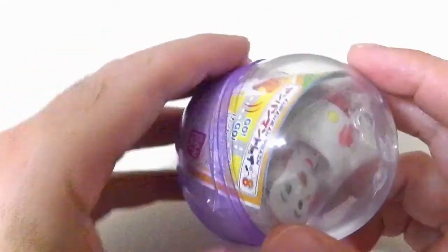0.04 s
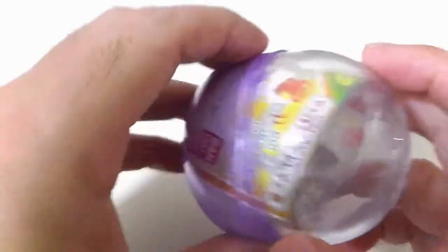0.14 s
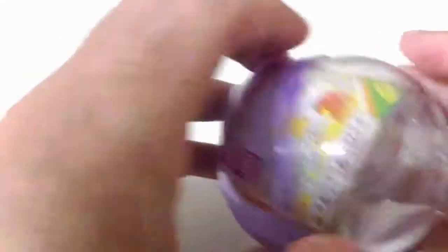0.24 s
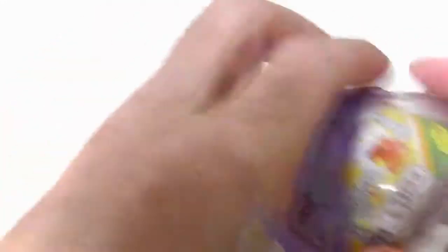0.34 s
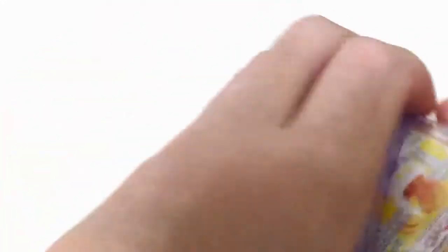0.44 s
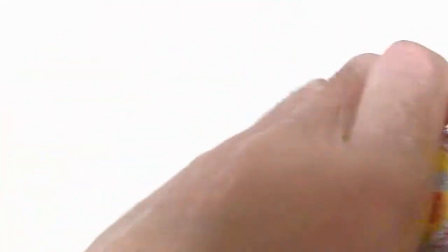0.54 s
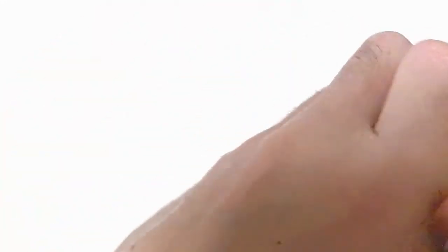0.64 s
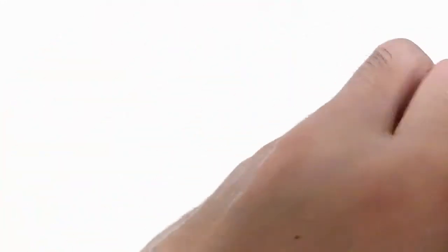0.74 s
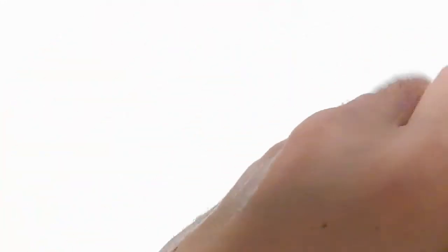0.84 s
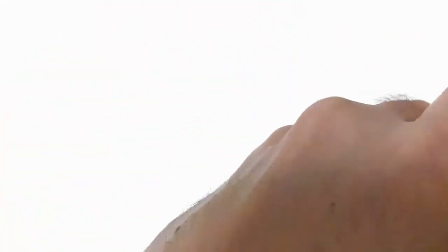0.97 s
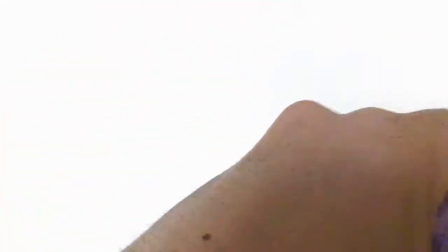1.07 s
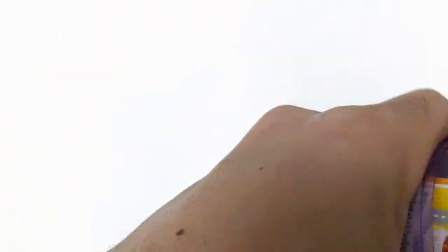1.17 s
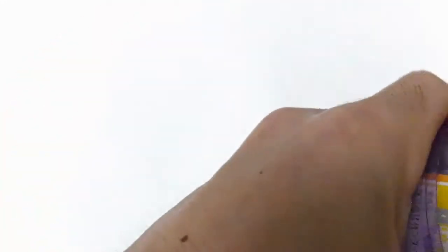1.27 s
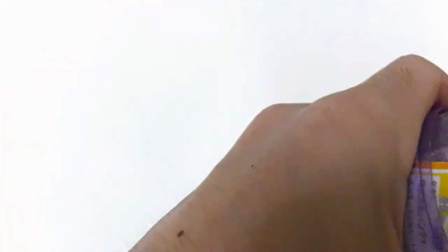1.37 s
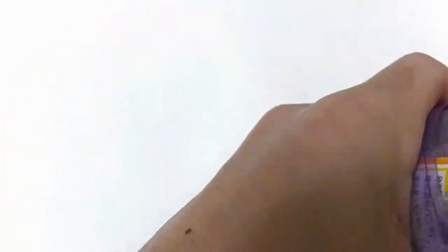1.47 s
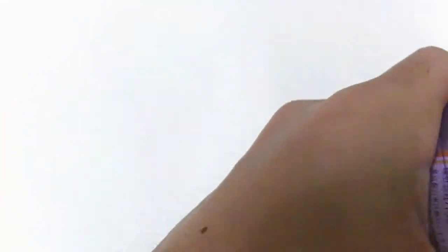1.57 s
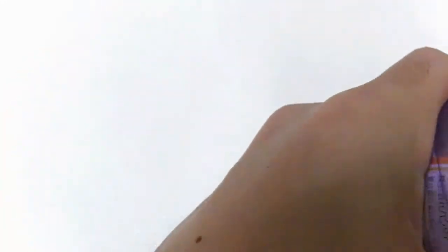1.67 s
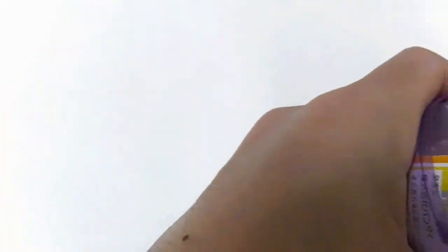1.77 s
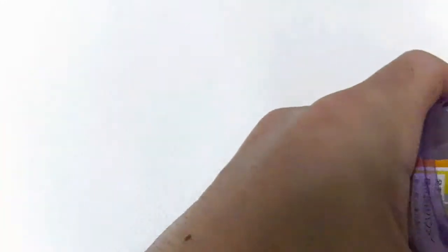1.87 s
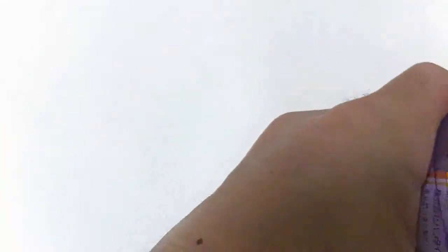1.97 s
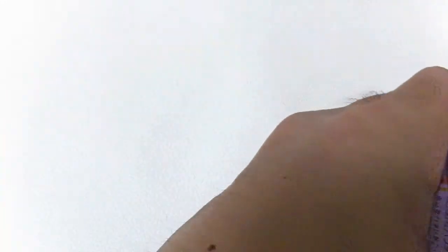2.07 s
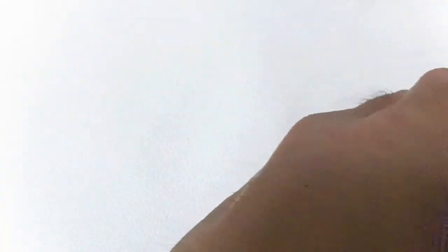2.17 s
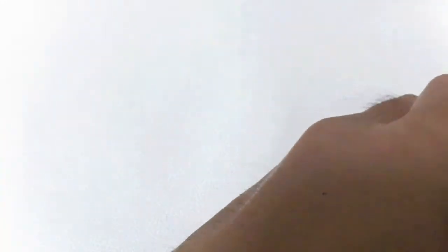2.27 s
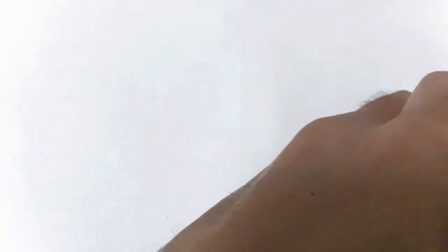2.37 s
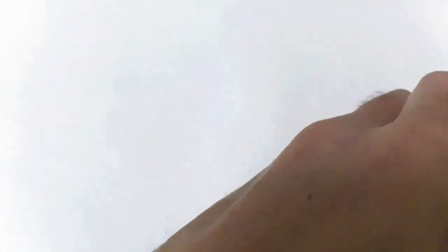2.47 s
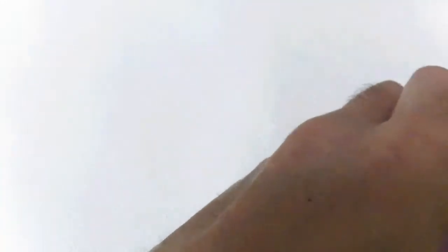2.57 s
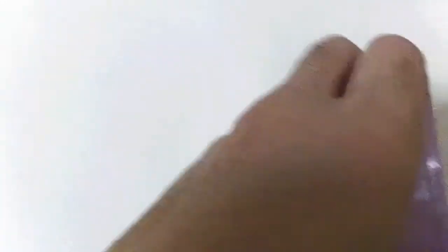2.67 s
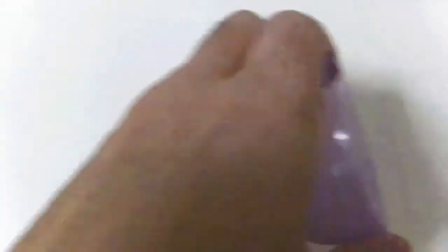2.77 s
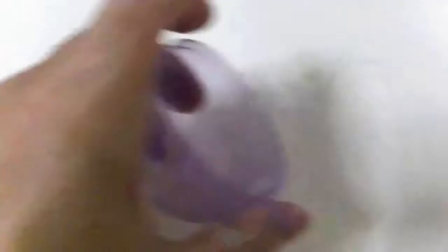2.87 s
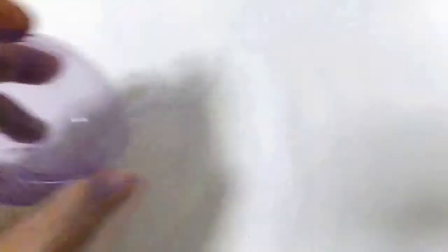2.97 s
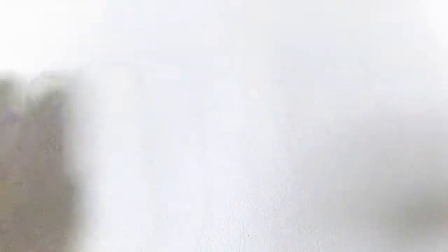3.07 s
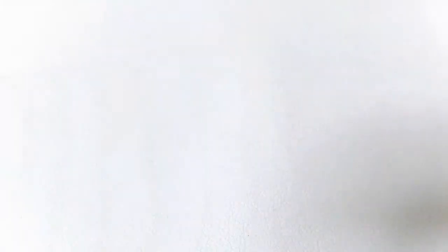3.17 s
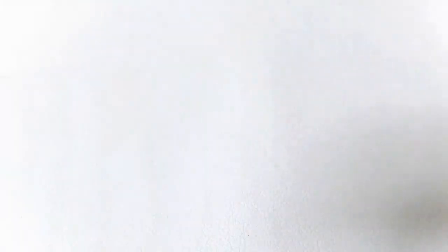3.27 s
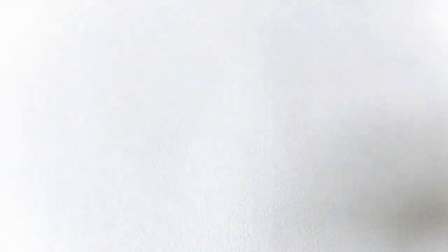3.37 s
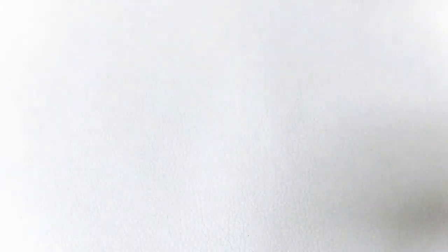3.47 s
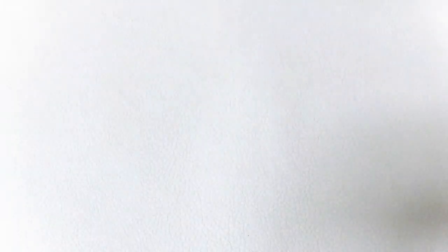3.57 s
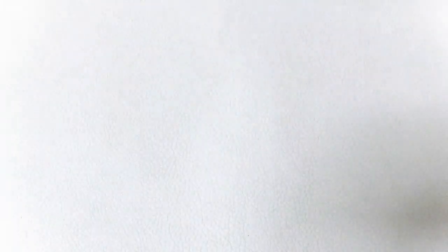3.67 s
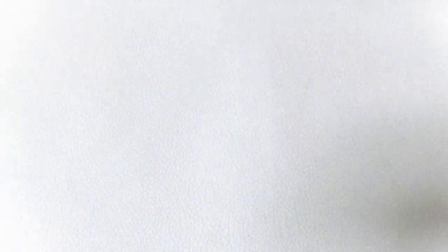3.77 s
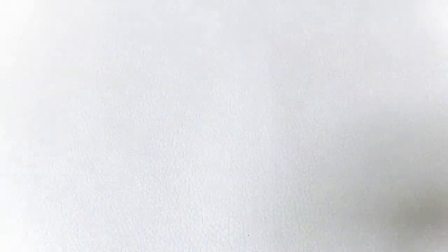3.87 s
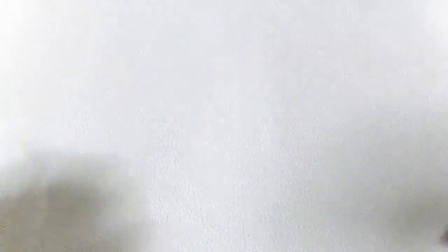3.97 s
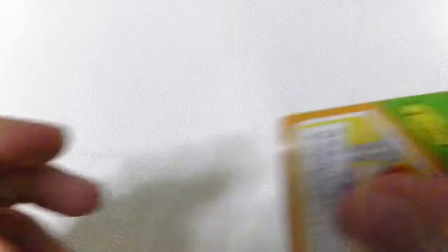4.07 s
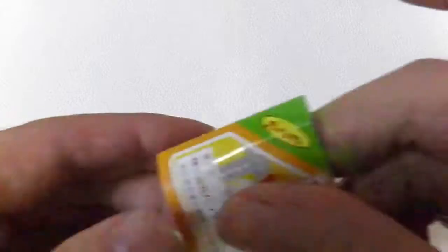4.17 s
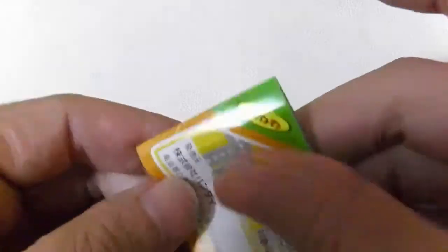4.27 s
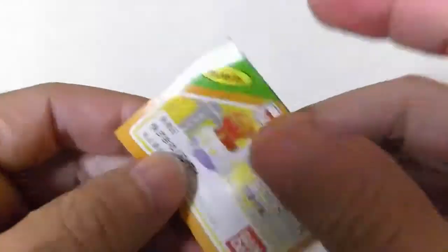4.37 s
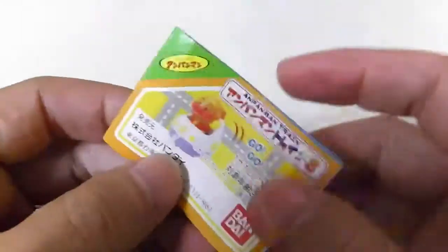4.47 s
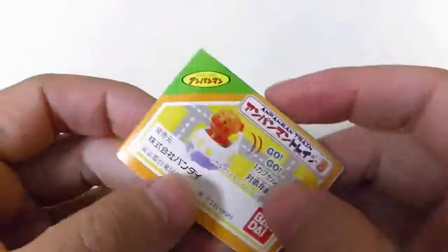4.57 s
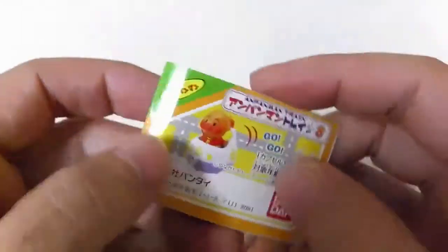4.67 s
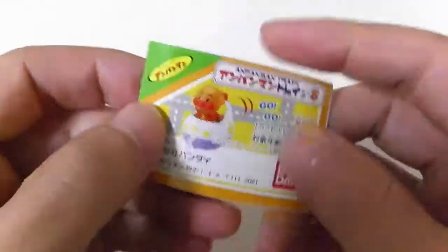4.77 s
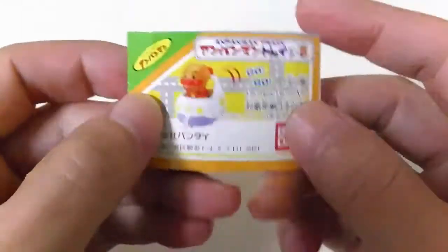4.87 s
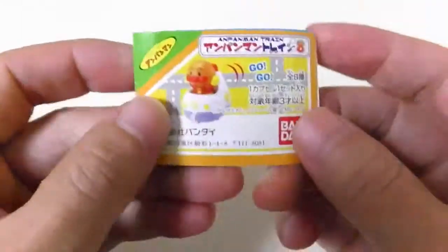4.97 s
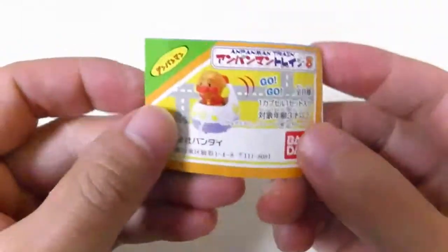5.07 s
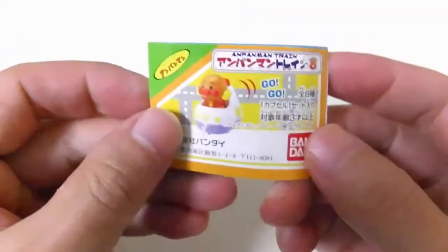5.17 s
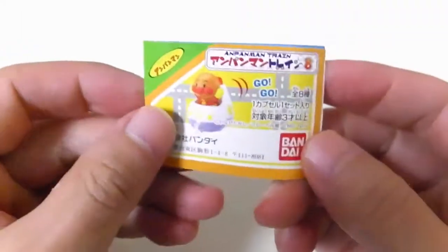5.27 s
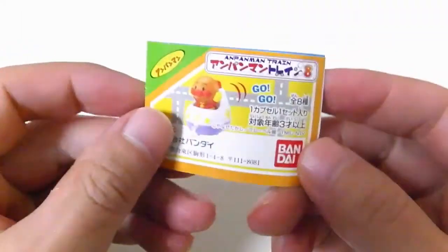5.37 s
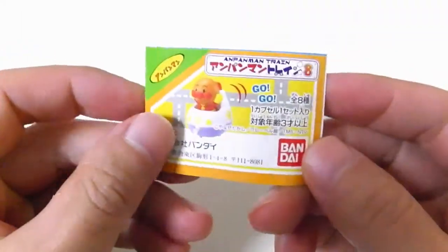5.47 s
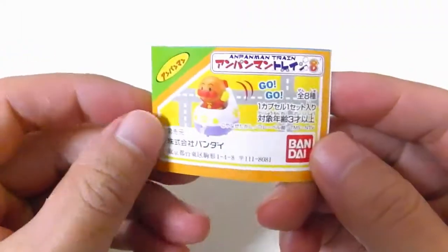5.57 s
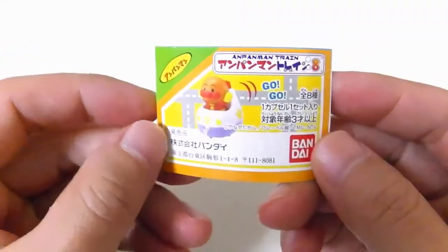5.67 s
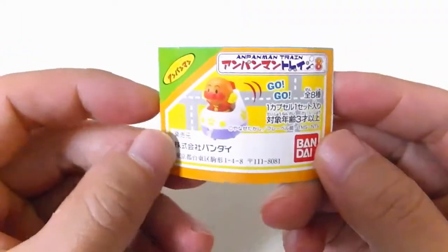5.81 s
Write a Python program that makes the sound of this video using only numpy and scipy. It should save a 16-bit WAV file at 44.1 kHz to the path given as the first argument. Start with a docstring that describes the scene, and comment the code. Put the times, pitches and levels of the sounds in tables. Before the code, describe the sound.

Close plastic capsule clicks and cracks open, its hollow shell pieces clack onto a table, then faint paper rustling fades into a quiet, hissy room.

```python
"""Hands pry a plastic toy capsule apart close to a pair of microphones, set its halves down on a table,
then pull out a folded paper slip and open it. Uneven bursts ring the hollow shell and crack in the treble;
random slips of fingers and paper rub and rustle throughout; soft pushes make the table boom, the last
just after 5.3 s. Room and hiss lie behind. The recorder passes the treble a little ahead of the rest."""
import sys
import numpy as np
from scipy import signal
from scipy.fft import rfft, irfft, next_fast_len
from scipy.io import wavfile
from scipy.ndimage import uniform_filter1d

SR = 44100
rng = np.random.default_rng(int(sys.argv[2]) if len(sys.argv) > 2 else 0)


def persist_wave(psi):
    """Save psi, clipped to +-1, as 16-bit WAV."""
    counts = np.round(np.clip(psi, -1, 1) * 32767).astype(np.int16)
    wavfile.write(sys.argv[1], SR, np.atleast_2d(counts).T)


N = 257544
SPLIT_HZ = 4050  # the treble starts here

# snaps and taps, timed ahead of the treble lead, levels ahead of filters and lean:
# (t/s, shell ring level/dB, crack level/dB, ring centre f/Hz, ring breadth/octaves, time scale/ms)
SNAPS = [(0.012, -36, -60, 2310, 3.9, 10.4), (0.1086, -38, -33.5, 2500, 0.68, 3.5),
         (0.622, -37.5, -42, 1820, 1.3, 2.9), (0.7397, -36, -36, 2130, 0.59, 3.2),
         (0.9518, -26.5, -31.5, 536, 1.1, 3.16), (1.007, -27, -47, 554, 0.8, 3.2),
         (1.046, -13, -13.5, 660, 0.41, 3.54), (1.056, -16.5, -33, 1010, 3, 4),
         (1.0748, -18.5, -25, 1290, 0.63, 2.54), (1.078, -27, -28, 1470, 0.74, 3.4),
         (1.0964, -18, -20.5, 1700, 0.81, 2.56), (1.113, -46, -36, 2200, 0.61, 2.8),
         (1.1611, -29.5, -39, 1046, 0.15, 5.1), (1.259, -63, -28, 2350, .75, 6.1),
         (1.2882, -32.5, -39, 1590, 0.87, 2.43), (1.398, -36.5, -30.5, 1780, 2.7, 4.4),
         (1.6286, -35.5, -27, 2520, 0.87, 2.8), (1.8749, -9, -28, 1240, 0.51, 3.3),
         (1.881, -14, -36.5, 1380, 0.55, 22), (1.9254, -6.5, -15, 1870, 0.54, 5.5),
         (1.9283, -7.5, -38, 1500, 1.58, 15), (2.2681, -27.5, -17.5, 2150, 1.05, 3),
         (2.2871, -34.5, -30, 1730, 1.3, 6.6), (2.319, -40.5, -52, 1000, 0.19, 3.7),
         (2.373, -41, -26.5, 2420, 0.44, 1.9), (2.3804, -41, -26, 2500, 0.56, 3.5),
         (2.4107, -19, -9, 3190, 0.15, 1.21), (2.479, -39.5, -29.5, 2070, 1.2, 13),
         (2.5004, -34.5, -39, 1420, 1.7, 10), (2.559, -26.5, -34.5, 2230, 0.42, 3.6),
         (2.6419, -26, -33, 2040, 1.8, 2.64), (2.65, -26.5, -30, 2600, 0.27, 5.3),
         (2.66, -32, -24, 3260, 0.32, 3.3), (2.819, -34.5, -30, 2720, 0.72, 5.2),
         (2.8361, -35, -35, 2980, 0.45, 11), (2.853, -24.5, -23.5, 1430, 1.1, 3.4),
         (2.906, -33.5, -37, 1600, 1.3, 6.1), (2.9628, -35.5, -36, 1850, 1.6, 4.1),
         (3.004, -33, -63, 970, 0.67, 2.53), (3.058, -31, -24, 2500, 0.57, 6.2),
         (3.19, -36, -50, 1280, 0.29, 3.5), (3.182, -46, -29, 1410, 0.66, 2.6),
         (3.2802, -12.5, -20, 1620, 0.67, 7.6), (3.3848, -44, -45, 2300, 0.62, 2.4),
         (3.6304, -28.5, -30, 1380, 6.4, 2.07), (3.6384, -30.5, -26, 1950, 0.58, 5.5),
         (3.7102, -5, -12.5, 955, 1.5, 6.7), (3.712, -16.5, -11.5, 1380, 0.76, 8.7),
         (3.7299, -11.5, -21, 990, 0.71, 18.4), (4.24, -51, -35, 2470, 1.1, 9.3),
         (4.246, -34, -28.5, 1500, 4.3, 2.75), (4.2904, -37.5, -40, 2640, 0.38, 2.2),
         (4.427, -44.5, -59, 2870, 0.18, 1.4), (4.518, -44, -40, 2700, 0.63, 1.12),
         (4.7482, -47, -33, 1320, 1.6, 2.7)]
# modes of the hollow shell, undamped by the hands: (f/Hz, level/dB, t60/s)
SHELL_MODES = [(440, -6, .12), (542, 3, .12), (675, -5, .15), (738, -3, .2), (900, -2, .16), (1060, 1, .13),
               (1190, -3, .14), (1322, -2, .15), (1543, -3, .14), (1790, 1, .12), (2000, -1, .14),
               (2360, -5, .06), (2690, 0, .09), (3050, -5, .08), (3350, -5, .06), (3700, -3, .05)]


def from_db(db):
    """Gain of a level."""
    return 10 ** (np.asarray(db) / 20)


def rms_one(x):
    """Scaled to rms 1."""
    return x / np.sqrt(np.mean(x ** 2) + 1e-20)


def at_hz(points, hz):
    """A spectrum read on a log-frequency axis."""
    points_hz, values = np.array(points).T
    return np.interp(np.log(np.maximum(hz, 1)), np.log(points_hz), values)


def coloured(x, spectrum):
    """x shaped by a (f/Hz, level/dB) spectrum; rms 1."""
    size = next_fast_len(N)
    hz = np.arange(size // 2 + 1) * SR / size
    shaped = irfft(rfft(x, size) * from_db(at_hz(spectrum, hz)), size)
    return rms_one(shaped[..., :N])


def drift(rate):
    """Slow chance: straight lines between random points, rate of them a second; rms 1."""
    points = rng.standard_normal(int(N / SR * rate) + 2)
    return rms_one(np.interp(np.arange(N) / SR * rate, np.arange(len(points)), points))


def ringing(modes, gains, seconds):
    """Struck modes: a sum of sines, each losing 60 dB in its own t60."""
    t = np.arange(int(seconds * SR)) / SR
    hz, db, t60 = np.transpose(modes)[:, :, None]
    decay = from_db(db - 60 * t / np.maximum(t60, .005))
    return gains @ (decay * np.sin(2 * np.pi * hz * t))


def peak_at(x, db):
    """Scaled so that the envelope over the loudest millisecond or so has this level."""
    power = uniform_filter1d(np.mean(np.atleast_2d(x) ** 2, axis=0), 50)
    return x * from_db(db) / np.sqrt(2 * power.max())


def add(out, sound, s):
    """Mixes a sound in at time s."""
    at = round(s * SR)
    out[..., at:at + sound.shape[-1]] += sound[..., :N - at]


def sides(db):
    """Left and right gains of a left-minus-right difference."""
    return from_db(np.array([db / 2, -db / 2]))


def passed(x, low_hz, high_hz):
    """A band-pass."""
    sos = signal.butter(2, [low_hz, min(high_hz, .45 * SR)], "band", fs=SR, output="sos")
    return signal.sosfilt(sos, x)


def treble(x):
    """The part above the split."""
    return signal.sosfilt(signal.butter(8, SPLIT_HZ, "high", fs=SR, output="sos"), x)


def patches(x, low_hz, bands, depth_db, rate):
    """Half-octave bands of x that swell and fade, each in its own time."""
    out = 0
    for low in low_hz * 2 ** (np.arange(bands) / 2):
        sos = signal.butter(2, [low, low * np.sqrt(2)], "band", fs=SR, output="sos")
        out = out + from_db(depth_db * drift(rate)) * signal.sosfilt(sos, x)
    return out


def air(level_db=-55, patchy_db=0.65):
    """Hiss and rumble, wavering slightly in level, partly shared by both microphones."""
    # colour of the background: (f/Hz, level/dB)
    air_colour = [(20, -44), (40, -9.5), (80, 3), (200, -1.5), (430, -4.5), (1100, -9), (3800, -12.5),
                  (5400, -16.5), (11000, -16), (15200, -23), (16500, -46)]
    # share of its power common to both microphones: (f/Hz, share)
    air_alike = [(100, 0.8), (1500, 0.22)]
    shared, left, right = rng.standard_normal((3, N))
    hz = np.arange(N // 2 + 1) * SR / N
    alike = np.clip(at_hz(air_alike, hz), 0, 1)
    common = np.sqrt(alike) * rfft(shared)
    own = np.sqrt(1 - alike) * rfft(np.array([left, right]))
    return from_db(level_db + patchy_db * drift(22.0)) * coloured(irfft(common + own, N), air_colour)


def room(x, alike=0.85):
    """Reflections as noise that dies octave by octave."""
    # decay of the room: (f/Hz, t60/s)
    room_t60 = [(100, 0.37), (700, 0.28), (3000, 0.22)]
    t = np.arange(int(.5 * SR)) / SR
    noise, tail = rng.standard_normal((3, len(t))), 0
    for low in 70 * 2.0 ** np.arange(8):
        band = signal.sosfilt(signal.butter(2, [low, 2 * low], "band", fs=SR, output="sos"), noise)
        tail = tail + band * from_db(-60 * t / at_hz(room_t60, low * np.sqrt(2)))
    tail = tail * np.minimum(t / 0.0048, 1)  # reflections build up over 4.8 ms
    pair = alike * tail[0] + (1 - alike) * tail[1:]
    pair = pair / np.sqrt(np.sum(pair ** 2) / 2)
    return signal.fftconvolve(x[None], pair, axes=1)[:, :N]


def knocks(reach_oct=0.57, push_s=0.00009):
    """A soft push booms the table top, most near the modes under it; a resting hand shortens the boom."""
    # knocks, levels ahead of the low cut: (t/s, peak level/dB, boom centre f/Hz, share of the free t60)
    pushes = [(0.0, -29, 98, 0.82), (1.049, -26, 209, 0.85), (1.88, -45, 340, 1), (3.71, -24.5, 214, 0.78),
              (5.32, -33, 210, 0.55), (5.327, -24.5, 195, 0.31)]
    # modes of the free table top: (f/Hz, level/dB, t60/s)
    table_modes = [(113.8, 3, 0.45), (140.2, -6.5, 0.53), (218, -0.5, 0.2), (340, 8, 0.21),
                   (437.4, 13.5, 0.33), (534, 24, 0.2)]
    out = np.zeros(N)
    push = np.hanning(max(int(push_s * SR), 3))
    for s, db, centre_hz, free in pushes:
        octaves_off = np.log2(np.array(table_modes)[:, 0] / centre_hz)
        near = from_db(-6 * (octaves_off / reach_oct) ** 2)
        boom = ringing(np.array(table_modes) * [1, 1, free], near, .5)
        boom = signal.fftconvolve(push, boom)
        add(out, from_db(db) * boom / np.abs(boom).max(), s)
    return signal.sosfilt(signal.butter(2, 80, "high", fs=SR, output="sos"), out)


def grains(per_s, size_db, clump_db):
    """Tiny random slips of uneven size, coming in clumps."""
    sizes = from_db(size_db * np.minimum(rng.exponential(1, N), 4)) * rng.choice([-1, 1], N)
    return sizes * (rng.random(N) < per_s * from_db(clump_db * drift(40)) / SR)


def pressure(stroke_column, snap_column, rattle_db):
    """Gain of the handling: strokes swell, hold and let go; loose contents rattle on after each snap."""
    # fingers over plastic and paper, levels ahead of the mix; an end before its start is a weaker brief touch:
    # (start t/s, end t/s, dull rubbing level/dB, bright rustle level/dB)
    finger_strokes = [(0.0, 0.0032, -42.5, -54), (0.075, 0.25, -60.5, -62), (0.586, 0.65, -61, -60),
                      (0.752, 0.88, -58, -59), (1.05, 1.058, -33, -38), (1.13, 1.296, -53.5, -53),
                      (1.36, 1.43, -50, -54), (2.289, 2.26, -37, -41.5), (2.41, 2.63, -51.5, -56),
                      (2.812, 3.1, -54.5, -58.5), (3.13, 3.155, -48.5, -50), (3.36, 3.5, -56, -60),
                      (3.631, 3.63, -46, -48.5), (3.695, 3.712, -40, -42), (4.265, 4.36, -61, -55),
                      (4.53, 4.66, -64, -60.5), (5.131, 5.25, -64, -58.5), (5.526, 5.43, -71, -54)]
    swell_db_per_s, let_go_db_per_s, rattle_fade_db_per_s = 388, 253, 192
    t = np.arange(0, N + 64, 64) / SR  # one point every 64 samples
    strokes, snaps = np.array(finger_strokes)[:, :, None], np.array(SNAPS)[:, :, None]
    before = swell_db_per_s * np.maximum(strokes[:, 0] - t, 0)
    after = let_go_db_per_s * np.maximum(t - strokes[:, 1], 0)
    stroke = from_db(strokes[:, stroke_column] - before - after)
    since = t - snaps[:, 0]
    fading_db = snaps[:, snap_column] + rattle_db - rattle_fade_db_per_s * np.abs(since)
    rattle = (since > 0) * from_db(fading_db)
    power = np.sum(stroke ** 2, axis=0) + np.sum(rattle ** 2, axis=0)
    return np.interp(np.arange(N) / SR, t, np.sqrt(power))


def handling(lean_db=-8.5):
    """Skin on plastic and creasing paper: the same slips give a dull rub, a faint ring and a bright rustle."""
    # colour of the dull rub: (f/Hz, level/dB)
    rub_colour = [(300, -20), (700, 1), (1500, -3), (3700, 0.5), (4400, -11.5)]
    # colour of the bright rustle: (f/Hz, level/dB)
    rustle_colour = [(4300, -20), (6500, -5), (9000, -8), (12500, -10.5), (16000, -28)]
    slips = rms_one(grains(per_s=800, size_db=3.5, clump_db=8.0))
    smooth = rng.standard_normal((3, N))
    rub = patches(slips + .3 * smooth[0] + .2 * smooth[1:], 300, 8, depth_db=2.0, rate=40)
    rustle = patches(slips + .5 * smooth[1:], 4000, 4, depth_db=1.6, rate=40)
    dull = pressure(2, 1, rattle_db=-28.5)  # rattle follows the shell ring
    bright = pressure(3, 2, rattle_db=-42)  # rattle follows the crack
    shell = ringing(np.array(SHELL_MODES) * [1, 1, 0.35], np.ones(len(SHELL_MODES)), .08)  # held: brief ring
    rung = signal.fftconvolve(dull * slips, shell / np.sqrt(np.sum(shell ** 2)))[:N]
    rubbed = 1.204 * dull * coloured(rub, rub_colour)
    rustled = bright * treble(coloured(rustle, rustle_colour)) * sides(lean_db)[:, None]
    return rubbed + 0.37 * rung + rustled


def clicks():
    """Each snap is a short uneven burst: it rings the shell modes near its centre and cracks in the treble."""
    # where the hands work, read between rows: (t/s, treble left minus right/dB, crack centre f/Hz)
    place = [(0.0, -3, 6260), (1.05, -7.5, 6440), (1.1, -7, 8000), (1.26, -6, 5300), (1.93, -13, 5460),
             (2.27, -6, 7550), (2.375, -5, 5300), (2.41, -8, 6400), (2.66, -6.5, 5240), (3.2, -5, 5340),
             (3.28, 5.5, 9700), (3.66, 0, 4900), (3.71, -6.5, 5710), (4.75, -3, 7140)]
    # some snaps, mostly hard ones, drive certain modes most: (from t/s, modes driven most [f/Hz])
    spots = [(0.94, [440, 542]), (1.04, [542, 1190, 2000, 3350]), (1.87, [1060, 1322, 2000]),
             (1.92, [542, 1060, 1543, 2690]), (3.27, [675, 1190, 1790, 2000, 3050]),
             (3.7, [542, 738, 1060, 1543])]
    spot_s, spot_gain_db = .045, 12
    reach, spread_db, linger_db = 0.8, 6.5, -11  # mode reach per breadth, mode unevenness, ring left free
    grit, rise, knock = 0.61, 0.45, 0.57  # burst beside the main slip, rise per time scale, dead part
    wide, snap, broad = 0.39, 0.18, 1.726  # crack: unshared noise, main slip, band edge ratio
    brief, after_db, scatter_oct = 0.64, -17, .07  # crack: tick width, sizzle level, pitch scatter
    lean_spread_db = 2  # random spread of the shell's left-right lean from snap to snap
    shell, crack = np.zeros((2, N)), np.zeros((2, N))
    t, ring_t = np.arange(int(.05 * SR)) / SR, np.arange(int(.16 * SR)) / SR
    hz = np.array(SHELL_MODES)[:, 0]
    place_s, place_lean_db, place_hz = np.array(place).T
    for s, ring_db, crack_db, ring_hz, octaves, ms in SNAPS:
        lean_db = np.interp(s, place_s, place_lean_db)
        crack_hz = np.interp(s, place_s, place_hz) * 2 ** (scatter_oct * rng.standard_normal())
        driven = sum(np.isin(hz, modes) for start, modes in spots if start < s < start + spot_s)
        noise, uneven = rng.standard_normal((3, len(t))), rng.standard_normal(len(hz))
        length = np.clip(ms, 1, 30) / 1000
        rise_s = min(rise * length, .0016)
        top, rising = int(rise_s * SR), np.minimum(t / rise_s, 1)
        burst = noise[0] * rising * from_db(-14 * t / length)
        burst = burst / np.sqrt(np.sum(burst ** 2))
        blow = grit * burst
        blow[top] += 1  # one slip carries most of the blow

        near_db = -6 * (np.log2(hz / ring_hz) / (reach * octaves)) ** 2
        uneven_db = spread_db * uneven / (1 + 2 * np.any(driven))
        near = from_db(near_db + uneven_db + spot_gain_db * driven)
        # fingers kill most of the ring at once; long blows leave more of it free
        grip = from_db(-16.0 * ring_t / length) + from_db(linger_db) * min(ms / 8, 1.2) ** 1.1
        # each mode is a pair of randomly detuned sines, which beat
        detuned = np.array(SHELL_MODES) * (1 + [.007, 0, 0] * rng.standard_normal((2, len(hz), 1)))
        ring = grip * (ringing(detuned[0], near, .16) + .6 * ringing(detuned[1], near, .16))
        shell_lean = sides(lean_spread_db * rng.standard_normal())[:, None]
        add(shell, shell_lean * peak_at(signal.fftconvolve(blow, ring), ring_db), s)
        # plastic too damped to ring, leaning the other way
        dead = passed(blow + 1.8 * burst, ring_hz / 1.82 ** octaves, ring_hz * 1.63 ** octaves)
        add(shell, shell_lean[::-1] * knock * peak_at(dead, ring_db), s)

        # the crack is a brief tick with a weaker sizzle behind it
        tick = from_db(-9 * (t / (brief * length)) ** 2)
        sizzle = from_db(after_db - 2.2 * t / length)
        pair = rising * (tick + sizzle) * (noise[0] + wide * noise[1:])
        pair[:, top] += snap * np.sqrt(np.mean(np.sum(pair ** 2, axis=1)))
        far = int(lean_db > 0)
        pair[far] = np.roll(pair[far], 1)  # the far microphone hears it a sample late
        pair = passed(pair, crack_hz / broad, crack_hz * broad)
        add(crack, peak_at(pair * sides(lean_db)[:, None], crack_db), s)
    body = signal.butter(3, [400, SPLIT_HZ], "band", fs=SR, output="sos")  # a small shell radiates no bass
    return signal.sosfilt(body, shell), treble(crack)


def scene():
    """Shell, cracks, table and handling close by, with room on all but the handling, over the hiss."""
    shell, crack = clicks()
    table = knocks()
    wet = from_db(-8.5) * shell.mean(axis=0)
    wet = wet + from_db(-11.0) * crack.mean(axis=0) + from_db(-8.5) * table
    return shell + crack + table + room(wet) + handling() + air()


def record(dry, treble_lead_s=.02154, cutoff_hz=16200):
    """The band above the split comes out early; peaks are rounded; deepest bass and the top are cut."""
    size = next_fast_len(N + 2000)
    longer = np.pad(dry, [(0, 0), (0, size - N)], "reflect")  # the hiss carries on past the end
    hz = np.arange(size // 2 + 1) * SR / size
    above = 1 / (1 + np.exp(np.clip((SPLIT_HZ - hz) / 60, -50, 50)))
    early = np.exp(2j * np.pi * hz * treble_lead_s)
    shifted = irfft(rfft(longer) * (1 - above + above * early), size)[:, :N]
    rounded = 1.4 * np.tanh(shifted / 1.4)
    no_bass = signal.sosfilt(signal.butter(2, 30, "high", fs=SR, output="sos"), rounded)
    return signal.sosfilt(signal.ellip(10, .5, 70, cutoff_hz, fs=SR, output="sos"), no_bass)


dry = scene()
out = record(dry)
persist_wave(out)
```